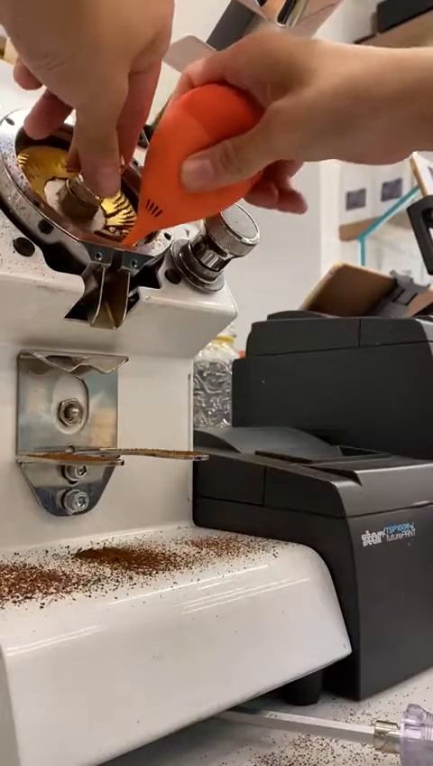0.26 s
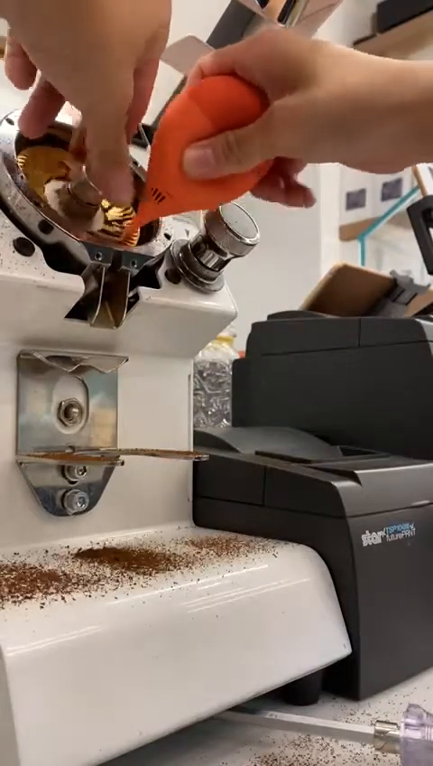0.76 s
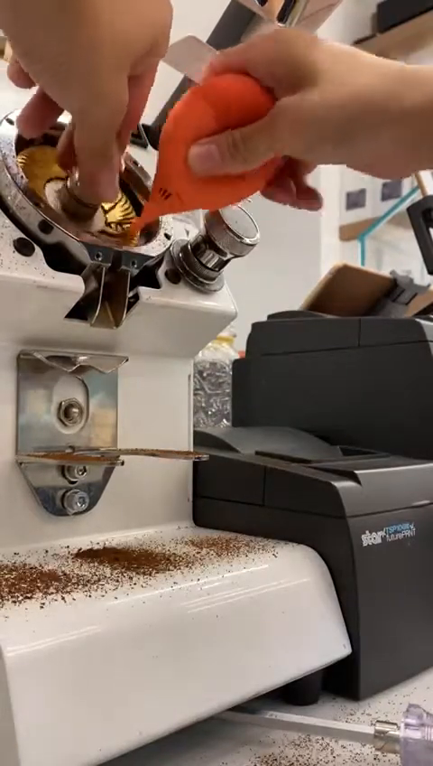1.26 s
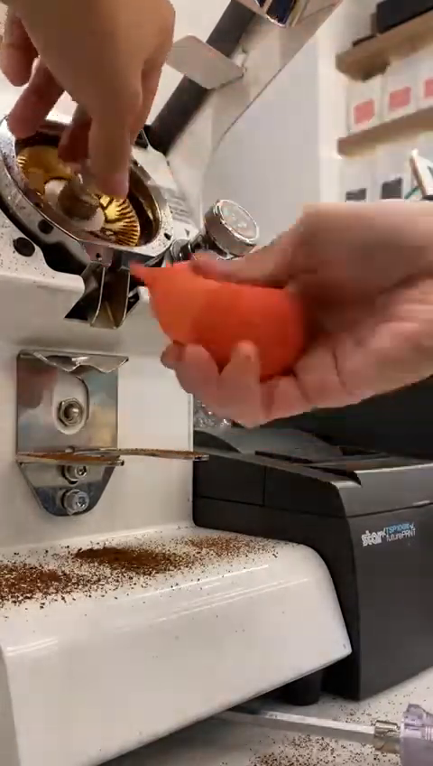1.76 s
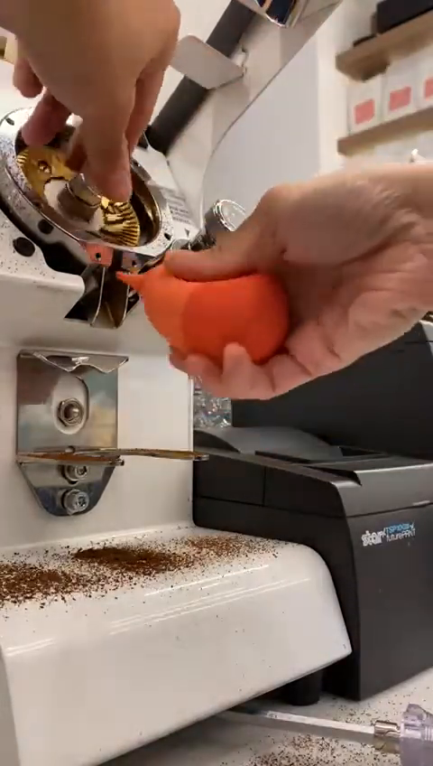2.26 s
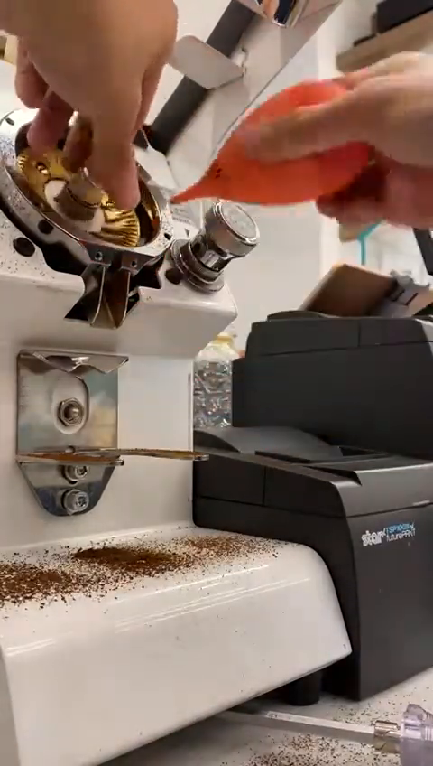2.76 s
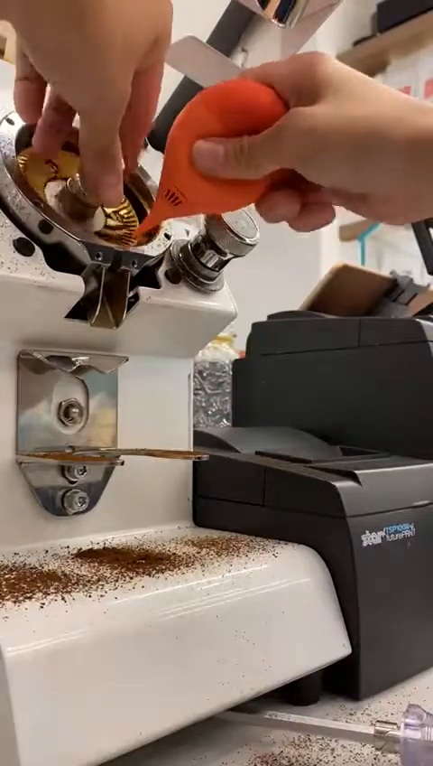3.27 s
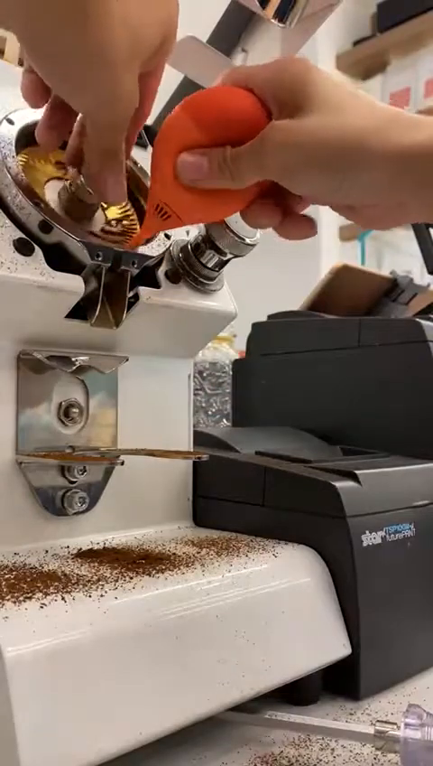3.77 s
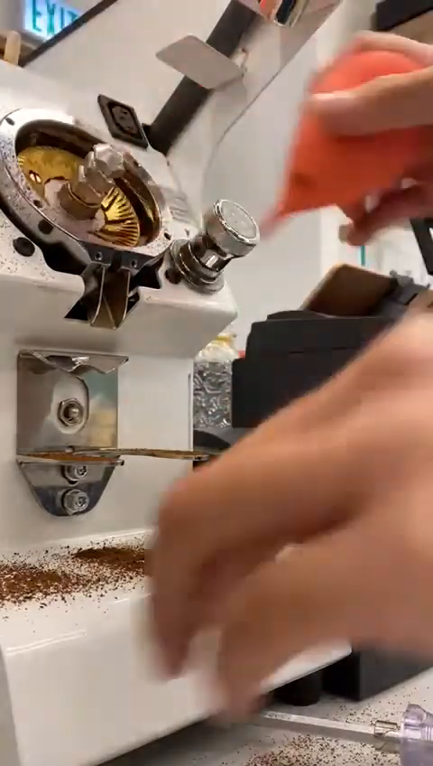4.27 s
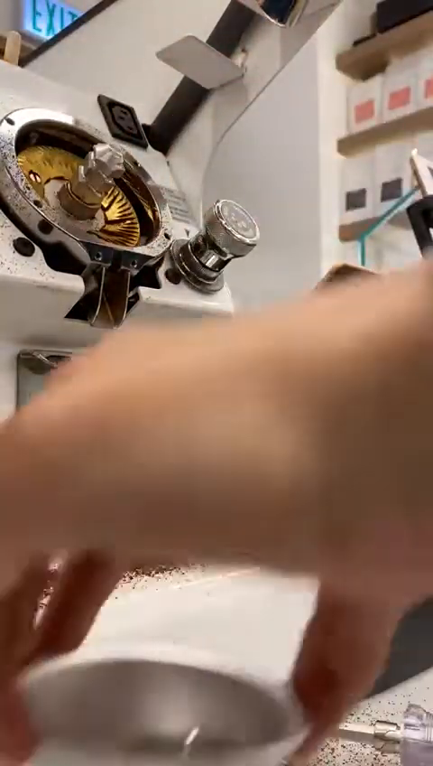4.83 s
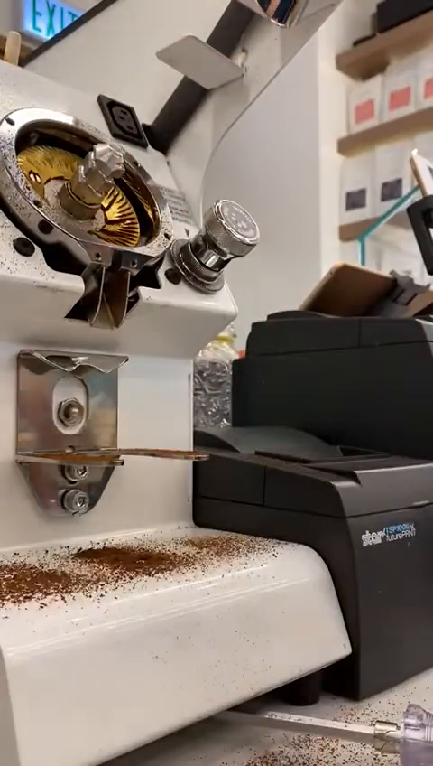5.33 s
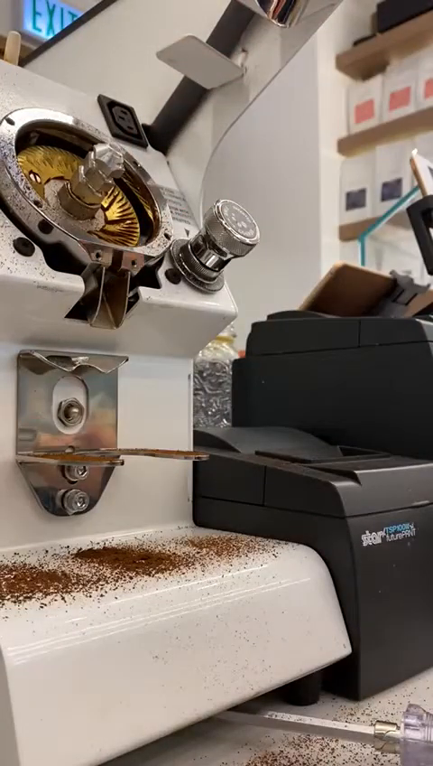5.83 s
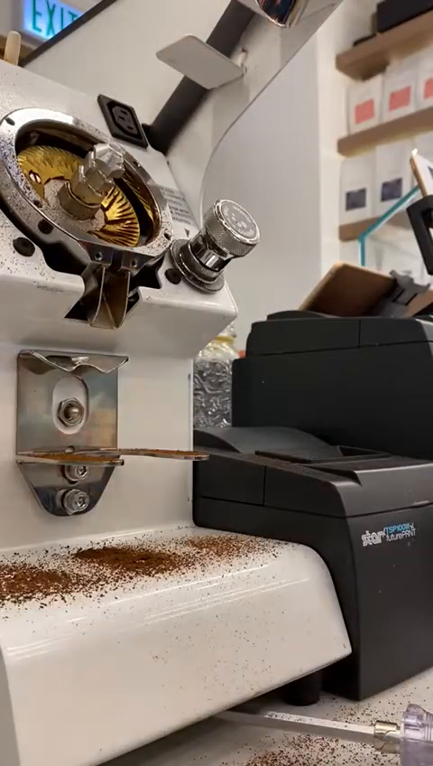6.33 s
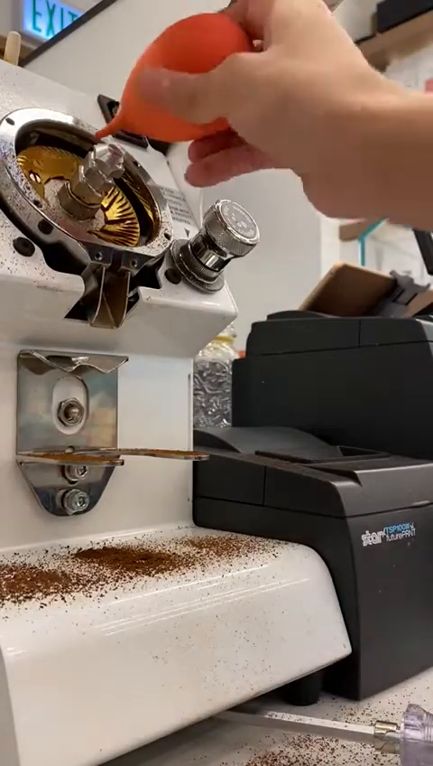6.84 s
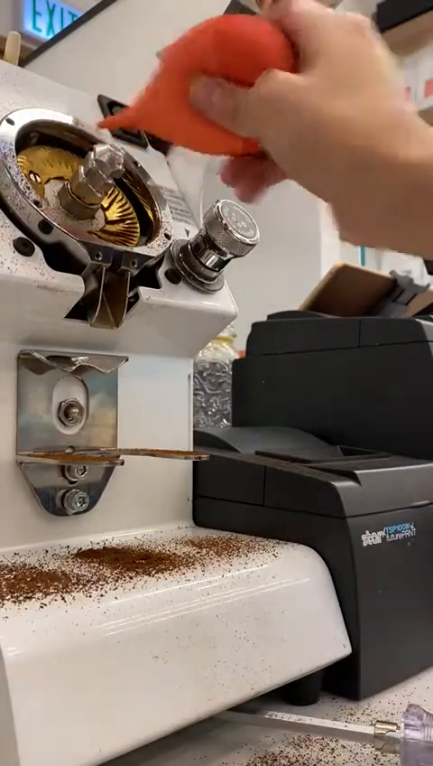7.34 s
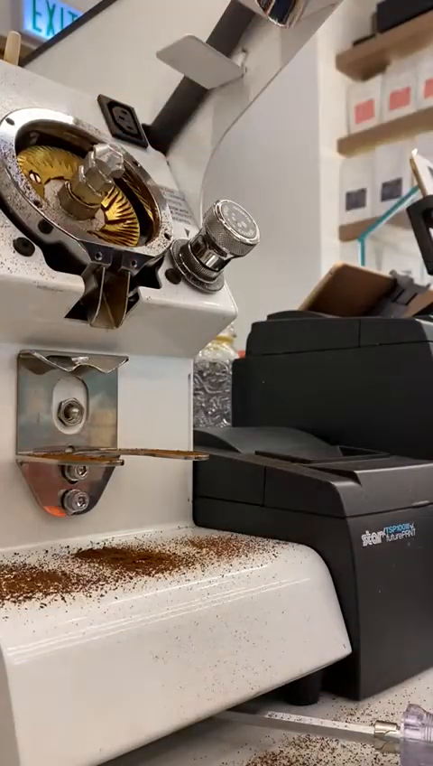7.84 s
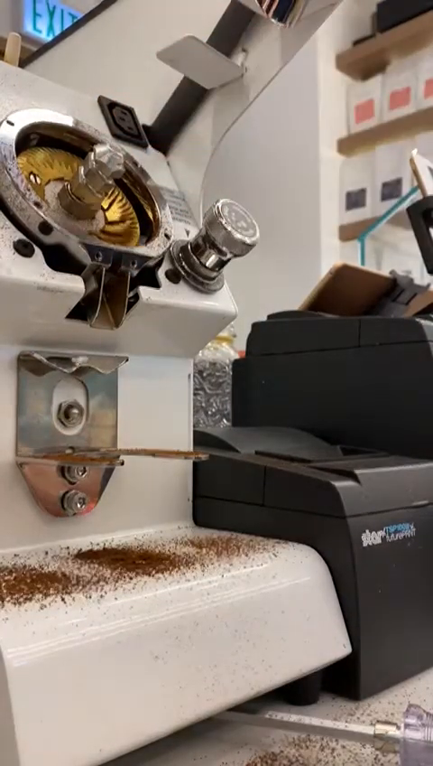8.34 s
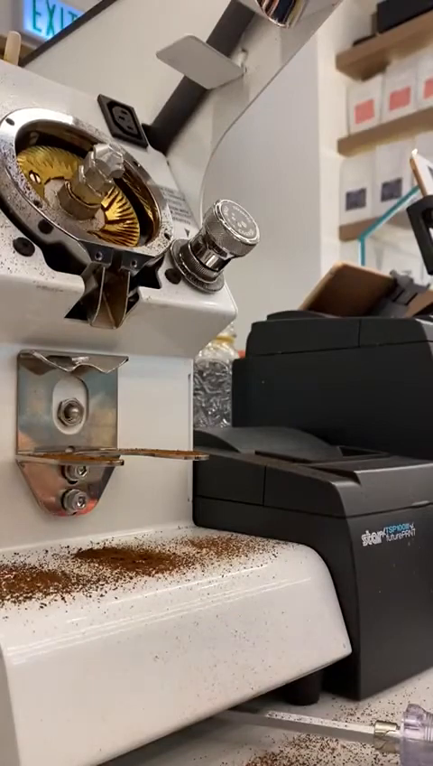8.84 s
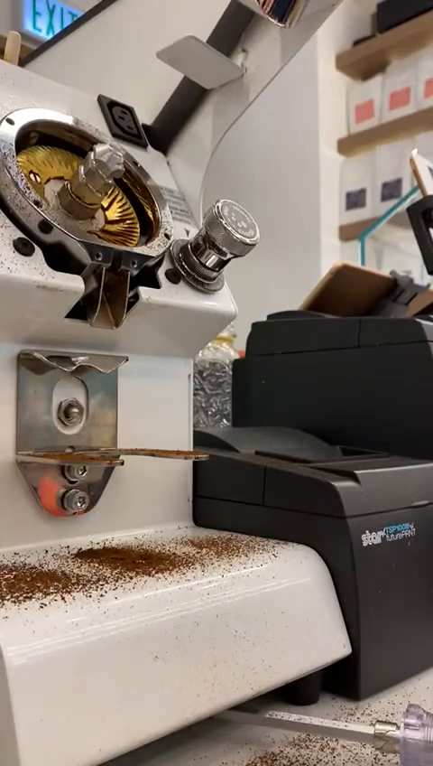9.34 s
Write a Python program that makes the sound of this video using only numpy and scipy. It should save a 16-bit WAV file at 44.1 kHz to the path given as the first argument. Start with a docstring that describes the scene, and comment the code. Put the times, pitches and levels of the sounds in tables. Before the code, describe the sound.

Quick squeezed air blasts with sucking refills, steel knocks and clinks, a bulb set down on a hollow lid, steady motor drone beneath.

```python
"""A counter in a room, heard close up by two microphones: a rubber bulb puffs air into a grinder's burr chamber
and hisses as it refills, each breath being noise shaped by flow strokes and resonances.
Steel, mostly a cup, is knocked and scraped (ringing modes, ticking noise) and clinks; the bulb is put down
on a hollow lid; two heavy thuds boom late. A motor beats against mains buzz, over air hiss and the drone,
rumble and tyres of a vehicle outside that speeds up and slows."""
import sys
import numpy as np
from scipy import signal
from scipy.fft import rfft, irfft
from scipy.io import wavfile

SR = 44100
rng = np.random.default_rng(int(sys.argv[2]) if len(sys.argv) > 2 else 0)


def bounce(signal):
    """Save signal as a 16-bit WAV file at the path given by the first command-line argument."""
    frames = np.transpose(np.atleast_2d(signal))
    limited = np.clip(frames, -1, 1)
    pcm = np.round(limited * 32767).astype(np.int16)
    wavfile.write(sys.argv[1], SR, pcm)


def how_loud(loudness_db):
    """Turn decibels into a plain amplitude multiplier (0 dB gives 1, 20 dB gives 10)."""
    steps = np.asarray(loudness_db, float) / 20
    return 10 ** steps


N = 423360  # samples
T = np.arange(N) / SR  # seconds
F = np.arange(N // 2 + 1) * SR / N + 1  # Hz, lifted by 1 to avoid zero


def noise():
    """White noise."""
    return rng.standard_normal(N)


def level(x, db):
    """Scale to an rms level."""
    return x * how_loud(db) / np.sqrt(np.mean(x ** 2))


def colour(x, points):
    """Filter by a curve of (Hz, dB) points, straight over log frequency, -60 dB outside it."""
    hz, db = np.transpose(points)
    gain_db = np.interp(np.log(F), np.log(hz), db, -60, -60)
    return irfft(rfft(x) * how_loud(gain_db), N)


def resonate(spectrum, peaks):
    """Pass a spectrum through a sum of steep (Hz, width Hz, dB) resonances; rms 1."""
    gain = sum(how_loud(db) / (1 + 1j * (F / hz - hz / F) * hz / width) ** 2 for hz, width, db in peaks)
    return level(irfft(spectrum * gain, N), 0)


def walk(rate):
    """Random levels joined by straight lines, rate points a second; spread about 1.75."""
    points = rng.standard_normal(int(rate * N / SR) + 2)
    return 2.1392 * np.interp(T * rate, np.arange(len(points)), points)


def add(track, s, sound):
    """Mix a sound in at time s."""
    i = int(s * SR)
    track[i:i + len(sound)] += sound[:N - i]


def ring(modes, contact_s, db, crack_db=-30, scatter=0., crack_hz=(1500, 9000)):
    """A short rough contact cracks and rings (Hz, dB, t60 s) modes, each blow a little different; peak at db."""
    t = T[:int(SR * (max(m[2] for m in modes) + 8 * contact_s))]
    chance = rng.standard_normal((len(modes), 2)) * scatter
    free = []
    for (hz, mode_db, t60), (detune, boost) in zip(modes, chance):
        decay = np.exp(-np.log(1000) * t / t60)
        free.append(how_loud(mode_db + 60 * boost) * decay * np.sin(2 * np.pi * hz * (1 + detune) * t))
    free = np.array(free)
    # the contact force: noise with a quick rise and a dying tail
    u = t[:len(t) // 2] / max(contact_s, 1 / SR)
    push = rng.standard_normal(len(u)) * np.minimum(3.7 * u, 1) * np.exp(-u)
    pushed = signal.fftconvolve(free, push[None], axes=1)[:, :len(t)]
    share = free.std(axis=1) / pushed.std(axis=1)  # every mode keeps its own level
    out = np.sum(pushed * share[:, None], axis=0)
    out = out / np.abs(out).max()
    crack = signal.sosfilt(signal.butter(2, crack_hz, "bandpass", fs=SR, output="sos"), push)
    add(out, 0, how_loud(crack_db) * crack / np.abs(crack).max())
    return out * how_loud(db) / np.abs(out).max()


def place(x, lag, echo_lag, echo):
    """Two ports: the right hears it after a lag and again off the counter; lags in samples, negative leads."""
    right = (np.roll(x, lag) + echo * np.roll(x, echo_lag)) / np.sqrt(1 + echo ** 2)
    return np.array([x, right])


ROOM_T60_S, ROOM_DB = 0.14677, -7


def room(x):
    """Add a short tail of decaying noise, different at each port."""
    t = T[:SR // 3]
    tails = rng.standard_normal((2, len(t))) * np.exp(-np.log(1000) * t / ROOM_T60_S)
    tails = tails * how_loud(ROOM_DB) / np.sqrt(np.sum(tails[0] ** 2))
    return x + signal.fftconvolve(x, tails, axes=1)[:, :N]


# The vehicle outside comes and goes. Each row: time in seconds, firing rate in Hz, relative level in dB.
VEHICLE = [(0.0, 46.61, -44), (1.07, 47.24, -39.5), (1.87, 58, -31), (2.81, 41.35, -37), (3.31, 39.63, -39),
           (4.2, 36.37, -38.5), (5.35, 42.34, -42.5), (5.93, 47.8, -47), (6.679, 49.91, -41),
           (7.3, 47.2, -49.5), (8.05, 52.38, -49), (8.6, 49, -46.5), (9.6, 49, -61)]
REFERENCE_DB = -45  # vehicle level at which hiss and rumble gain nothing


def vehicle():
    """Firing rate in Hz and level in dB over time, gliding from row to row."""
    s, hz, db = np.transpose(VEHICLE)
    return np.interp(T, s, hz), np.interp(T, s, db)


# Tone of the air hiss. Each row: frequency in Hz, relative level in dB.
AIR_TONE = [(500, -17.5), (900, -23), (1300, -5.5), (1560, -10.5), (1800, -14), (2800, -12.5),
            (3200, -19.5), (3600, -16), (6000, -23.5), (8500, -34.5), (12200, -26)]
AIR_DB, AIR_FOLLOW = -48, 0.3591  # base level; dB per dB of vehicle level


def air():
    """Smooth hiss, unrelated at the two ports, louder while the vehicle is near."""
    _, vehicle_db = vehicle()
    hiss = level(colour(rng.standard_normal((2, N)), AIR_TONE), AIR_DB)
    return hiss * how_loud(AIR_FOLLOW * (vehicle_db - REFERENCE_DB) + 1.2 * walk(8.2))


# Tone of the rumble. Each row: frequency in Hz, relative level in dB.
RUMBLE_TONE = [(20, -38), (32, -19.5), (55, -7.5), (110, -1), (175, -10), (300, -10), (420, -14.5),
               (620, -17.5), (900, -32.5), (2500, -43.5)]
# Resonance of the tyre noise. Each row: frequency in Hz, width in Hz, relative level in dB.
TYRE_RESONANCE = [(838.07, 356.24, 0)]
RUMBLE_DB, RUMBLE_FOLLOW = -35, 0.21784  # base level; dB per dB of vehicle level
TYRE_DB, TYRE_SWELL_DB, TYRE_SWELL_S, TYRE_WIDTH_S = -49, 6.5, 3.1518, 0.3148
HALF_ORDER_DB = -8  # the tone at one and a half times the firing rate


def street():
    """Engine drone, rumble and tyres through the wall; the bass is nearly alike left and right."""
    hz, db = vehicle()
    turn = 2 * np.pi * np.cumsum(hz) / SR
    half_order = how_loud(HALF_ORDER_DB + 1.3 * walk(0.86)) * np.sin(3 * turn / 2)
    drone = np.sqrt(2) * how_loud(db - 4.0 + 1.1 * walk(7.6)) * (np.sin(turn) + half_order)
    mid = colour(noise(), RUMBLE_TONE)
    # little width in the bass
    side = colour(colour(noise(), RUMBLE_TONE), [(20, -24.5), (110, -35.0), (350, -10.0), (700, -2.5), (3000, -10.5)])
    rumble = level(mid + side * np.array([[1], [-1]]), RUMBLE_DB)
    rumble = rumble * how_loud(RUMBLE_FOLLOW * (db - REFERENCE_DB) + 1.0 * walk(4.6))
    tyre_db = TYRE_DB + TYRE_SWELL_DB * np.exp(-((T - TYRE_SWELL_S) / TYRE_WIDTH_S) ** 2)
    tyres = resonate(rfft(rng.standard_normal((2, N))), TYRE_RESONANCE)
    return drone + rumble + tyres * how_loud(tyre_db + 0.5 * walk(8.7))


# The motor speed wanders a little. Each row: time in seconds, turning rate in Hz.
MOTOR_SPEED = [(0, 94.76), (1, 94.76), (2, 94.83), (3, 94.83), (4, 94.59), (5, 94.58), (6, 94.65),
               (7, 94.69), (9.6, 94.71)]
# Tones of the motor. Each row: multiple of the turning rate, level in dB, left minus right in dB.
MOTOR_ORDERS = [(1, -36.5, 1), (3, -39.5, -3), (4, -52, -2), (4.5, -58.5, 10), (5, -54, -5), (13, -60, 9.5),
                (14, -69, 22.5)]
MAINS_HZ, MAINS_DB = 99.99, -35
BEAT_PEAK_S = .066  # motor and mains are in step here


def hum():
    """Motor orders against mains buzz, about five beats a second."""
    turn = 2 * np.pi * np.cumsum(np.interp(T, *np.transpose(MOTOR_SPEED))) / SR
    turn = turn - turn[int(BEAT_PEAK_S * SR)]
    side = np.array([[.5], [-.5]])
    motor = sum(how_loud(db + pan_db * side + 1.3 * walk(4)) * np.cos(order * turn)
                for order, db, pan_db in MOTOR_ORDERS)
    mains = how_loud(MAINS_DB + 0.24 * walk(1.5)) * np.cos(2 * np.pi * MAINS_HZ * (T - BEAT_PEAK_S))
    return np.sqrt(2) * (motor + mains)


# Heavy thuds. Each row: start in seconds, knock level in dB, boom level in dB, contact in seconds,
# boom delay in seconds.
THUDS = [(.365, -11.5, -18.5, 0.01848, 0.024333), (8.362, -15, -19, 0.012356, 0.032352)]
# Modes of the counter. Each row: frequency in Hz, relative level in dB, t60 in seconds.
COUNTER_MODES = [(619.8, 7.5, 0.04766), (607.48, -15.5, 0.4097), (203.01, -8.5, 0.2639),
                 (334.15, 3, 0.02973), (797.96, -12.5, 0.14), (1090.3, -8.5, 0.02477),
                 (1371.5, -8.5, 0.06155), (1887.5, 0, 0.02625), (2520, -0.5, 0.03), (3184.8, -1.5, 0.0182)]
BOOM_HZ, BOOM_T60_S = 109.03, 0.4858


def thuds():
    """A wooden knock of counter modes, then the furniture's low decaying boom swells late."""
    knock, low = np.zeros((2, N))
    t = T[:SR // 2]
    swell = 1 - np.exp(-t / 0.0038)
    boom = swell * np.exp(-np.log(1000) * t / BOOM_T60_S) * np.sin(2 * np.pi * BOOM_HZ * t)
    for s, knock_db, boom_db, contact_s, late_s in THUDS:
        add(knock, s, ring(COUNTER_MODES, contact_s, knock_db, crack_db=-14))
        add(low, s + late_s, how_loud(boom_db) * boom / boom.max())
    return knock, low


SOFT_DB_PER_CYCLE = 1.097  # loss per cycle of the mode that fits in the contact


def dulled(modes, contact_s):
    """A longer, softer contact excites the high modes less."""
    return [(hz, db - SOFT_DB_PER_CYCLE * hz * contact_s, t60) for hz, db, t60 in modes]


# The bulb rocks on the lid. Each row: start in seconds, level in dB, contact in seconds,
# dry crack relative to the ring in dB.
PUT_DOWN = [(7.7233, -20.5, 0.0069, 12), (7.739, -32, 0.0047, 10.5), (7.748, -25.5, 0.0027, 1.5),
            (7.768, -15, 0.003215, 12.5), (7.779, -16, 0.0024, -20.5), (7.791, -22, 0.002, -14.5),
            (7.799, -29.5, 0.008, -8.5), (7.812, -31.5, 0.0086, -5.5), (7.838, -29.5, 0.0099, -17),
            (7.849, -28, 0.011625, -24.5), (7.926, -34.5, 0.0085, -21.5)]
# Modes of the hollow lid. Each row: frequency in Hz, relative level in dB, t60 in seconds.
LID_MODES = [(822.25, -9, 0.11), (1039.4, -13, 0.035), (1367.8, -3, 0.058), (1609.8, -2.5, 0.023),
             (1811.4, 8.5, 0.02581), (2113.5, 6.5, 0.023), (2478, -10.5, 0.034), (2692, -7.5, 0.04),
             (3272, -0.5, 0.05), (4553, -16, .02)]


def put_down():
    """Rubber rocking on a hollow lid: dry snaps and a short dull rumble from dulled modes."""
    out = np.zeros(N)
    for s, db, contact_s, crack_db in PUT_DOWN:
        modes = dulled(LID_MODES, contact_s)
        add(out, s, ring(modes, contact_s, db, crack_db, scatter=0.0362, crack_hz=(800, 3600)))
    return out


# Scrapes of the cup and rough noisy tails of the knocks. Each row: start in seconds, hold in seconds,
# wall level in dB, hollow relative to wall in dB, treble relative to wall in dB.
SCRAPES = [(3.349, 0.013, -39, -2, 0.5), (4.826, 0.05658, -37.5, -11, -2.5),
           (4.903, 0.06896, -38.5, -5.5, -5.5), (4.996, 0.017, -37.5, -5.5, -1.5),
           (5.027, 0.02877, -51.5, 5, -7), (5.071, 0.04636, -42, -1, 2.5),
           (5.159, 0.0404, -61.5, 17.5, -16), (5.297, 0.0083, -53, 4.5, -10.5),
           (5.414, 0.062, -46, -0.5, 2.5), (5.46, 0.047, -42, -0.5, 2), (5.514, 0.02552, -24.5, -5.5, -2),
           (5.548, 0.03925, -35.5, -1.5, -6.5), (5.645, 0.08654, -56.5, 0.5, 2),
           (5.784, 0.12, -56, 5, -4.5), (5.905, 0.1254, -50.5, -2, -12), (8.144, 0.032, -50.5, -6, 4),
           (8.172, 0.018, -40, 2, 1), (8.221, 0.0698, -53, 1, -11.5), (8.357, 0.051, -43, 6, -1),
           (8.576, 0.009, -46.5, 0, 2.5)]
SCRAPE_RISE_DB_PER_S, SCRAPE_FADE_DB_PER_S = 1306, 217


def scrape_swells(levels_db):
    """Amplitude of the scrapes and tails: quick rise, hold, slower fade, straight in dB."""
    total = np.zeros(N)
    for row, db in zip(SCRAPES, levels_db):
        start_s, hold_s = row[:2]
        rise = SCRAPE_RISE_DB_PER_S * (start_s - T)
        fade = SCRAPE_FADE_DB_PER_S * (T - start_s - hold_s)
        total += how_loud(db - np.maximum(rise, fade).clip(0, 200))
    return total


# Wall of the cup, rubbed. Each row: frequency in Hz, relative level in dB.
RUBBED_WALL = [(3750, -1.5), (4400, -1), (5500, -4.5), (6120, -2.5)]
# Hollow of the cup. Each row: frequency in Hz, width in Hz, relative level in dB.
HOLLOW = [(1052.7, 782.4, -17), (1914.2, 508.6, -5), (2400, 763.3, -9.5)]
# Treble modes of the steel, scraped or knocked. Each row: frequency in Hz, relative level in dB, t60 in seconds.
STEEL_TREBLE = [(7805.7, 3.5, 0.021), (9051, -1.5, 0.016), (10382, -1.5, 0.01), (11429, -4, .015)]
GRIP_DB = 2.8  # scales the random swell of each mode


def scraped_steel():
    """Rough steel contact: noise with sparse louder ticks in damped modes; returns body and treble."""
    _, _, wall_db, hollow_db, treble_db = np.transpose(SCRAPES)
    tick_db = 6.5 * rng.exponential(size=N).clip(0, 4) * (rng.random(N) < .012)
    ticks = rfft(noise() * how_loud(tick_db))
    # the grip shifts, so each mode swells and fades on its own
    wall = sum(how_loud(db + GRIP_DB * walk(45)) * resonate(ticks, [(hz, 700, 0)]) for hz, db in RUBBED_WALL)
    hollow = sum(how_loud(peak[2] + GRIP_DB * walk(45)) * resonate(ticks, [peak]) for peak in HOLLOW)
    body = how_loud(-7.5) * wall * scrape_swells(wall_db) + hollow * scrape_swells(wall_db + hollow_db)
    shine = resonate(ticks, [(hz, 900, db) for hz, db, _ in STEEL_TREBLE])
    return body, shine * scrape_swells(wall_db + treble_db) * how_loud(2.4545 * walk(43))


# What small thin steel sends out, with little bass. Each row: frequency in Hz, gain in dB.
THIN_STEEL = [(400, -40), (1200, -20), (1650, 0), (22050, 0)]
# Knocks on steel, mostly of the cup; the first is the bulb nozzle hitting metal. Each row: start in seconds,
# relative level in dB, lowest mode in Hz, relative treble in dB, contact in seconds.
KNOCKS = [(3.353, -17.5, 2400, 9, 0.0038), (4.825, -36, 2450, -3.5, 0.002),
          (4.889, -28.5, 2001, -6, 0.0022), (4.8642, -12, 1966, -17.5, 0.0013),
          (4.899, -24.5, 2166, -9, 0.0022), (4.908, -22.5, 2300, -13, 0.0018),
          (5.002, -25, 2087, -21, 0.0032), (5.098, -16.5, 1880, -17.5, 0.0013),
          (5.1023, -0.5, 1868, -17.5, 0.001788), (5.1605, -23, 2080, -27, 0.003),
          (5.393, -16.5, 2150, 3, 0.001207), (5.398, -25, 2300, -2, 0.00082),
          (5.514, -4.5, 2262, -7.5, 0.0012), (5.519, -17.5, 2300, -5, 0.002),
          (5.527, -14.5, 2210, -6.5, 0.0019), (5.5395, -11, 2450, 3, 0.0023),
          (5.6642, -24.5, 2006, -30.5, 0.0045), (5.8015, -30, 2044, -3.5, 0.0071),
          (5.844, -29, 2541, 0.5, 0.0041), (5.872, -33.5, 2300, -16.5, 0.003796),
          (5.8942, -12.5, 2450, -2, 0.0036), (5.901, -15.5, 2442, -2.5, 0.003834),
          (5.932, -9, 2520, -3, 0.003133), (5.94, -16.5, 2591, -3.5, 0.0029),
          (5.959, -18.5, 2690, -34.5, 0.0026), (6.0087, -25.5, 2564, 1, 0.0009),
          (8.169, -20.5, 2450, -9.5, 0.005676), (8.187, -12, 2400, -11.5, 0.0012),
          (8.193, -17, 2361, -22, 0.003), (8.204, -24.5, 2434, -16, 0.0044),
          (8.216, -30, 2400, -16.5, 0.0044), (8.36, -17.5, 2960, -8.5, 0.0018),
          (8.435, -25.5, 2589, 6, 0.0012), (8.445, -28.5, 2603, 8, 0.0014)]
# Upper modes of the steel. Each row: frequency in Hz, relative level in dB, t60 in seconds.
STEEL_MODES = [(3583.8, -1, 0.02858), (4159.5, -1.5, 0.0271), (5854, -1, 0.02645), (6232.2, 0, 0.0275)]
# the second upper mode weakens as the lowest mode drops below the full frequency
WALL_DB_PER_HZ, WALL_FULL_HZ, WALL_FULL_DB = 1.1338, 2450, 10
CRACK_DB, CRACK_PER_TREBLE_DB = -6, 1.1645  # the brighter the knock, the more dry crack


def knocked_steel():
    """Each contact rings its own lowest modes and shared upper ones; returns body and treble."""
    body, treble = np.zeros((2, N))
    first, second, *others = STEEL_MODES
    for s, db, hz, treble_db, contact_s in KNOCKS:
        wall_db = WALL_FULL_DB + WALL_DB_PER_HZ * min(hz - WALL_FULL_HZ, 0)
        wall = (second[0], wall_db, second[2])
        modes = [(hz, 12, .02), (1.0597 * hz, -2, .01), first, wall] + others
        crack_db = CRACK_DB + CRACK_PER_TREBLE_DB * treble_db
        add(body, s, how_loud(-5.5) * ring(modes, contact_s, db, crack_db, scatter=.022))
        add(treble, s, ring(STEEL_TREBLE, contact_s, db + treble_db - 0.5, crack_db=-10.5, scatter=0.0485))
    return colour(body, THIN_STEEL), treble


# Clinks of solid metal. Each row: start in seconds, relative level in dB, then the relative levels
# of the lowest, middle and top modes in dB.
CLINKS = [(8.315, -22, -26.5, -10, -10.5), (8.4133, -12, -12.5, -12, -23.5),
          (8.5704, -19, -33.5, -0.5, 3.5)]
# Short modes, then top modes. Each row: frequency in Hz, relative level in dB, t60 in seconds.
CLINK_SHORT = [(2280.4, -3, 0.01257), (2690, 2, 0.0143), (3322, -3.5, 0.00862), (5672, -13, 0.01)]
CLINK_TOP = [(6603.7, 2.5, 0.1455), (8875, -7, 0.0782), (10029, -11, 0.05)]
CLINK_LOW_HZ, CLINK_LOW_T60_S = 1872.1, 0.2884
CLINK_MID_HZ, CLINK_MID_T60_S = 4390, 0.1762


def clinks():
    """A clearer, longer ring of solid metal from a very short contact."""
    out = np.zeros(N)
    for s, db, low_db, mid_db, top_db in CLINKS:
        low = (CLINK_LOW_HZ, low_db, CLINK_LOW_T60_S)
        middle = (CLINK_MID_HZ, mid_db, CLINK_MID_T60_S)
        top = [(hz, mode_db + top_db, t60) for hz, mode_db, t60 in CLINK_TOP]
        add(out, s, ring([low, middle] + CLINK_SHORT + top, 0.001452, db, crack_db=-2.5))
    return colour(out, THIN_STEEL)


# The bulb wall pops back into shape. Each row: start in seconds, relative level in dB.
POPS = [(.475, -32.5), (.71, -35.5), (.94, -37.5), (1.175, -34.5), (1.4, -38.5), (1.97, -41), (2.235, -38),
        (2.49, -32.5), (7.4, -31.5)]
POP_HZ, POP_RISE, POP_S = 621.36, 0.26696, 0.026167  # start pitch, share it rises by, length


def pops():
    """The rubber wall springs back with a short blip of rising pitch."""
    out = np.zeros(N)
    t = T[:int(POP_S * SR)]
    cycles = POP_HZ * (t + POP_RISE * t ** 2 / POP_S / 2)
    blip = np.sin(np.pi * t / POP_S) ** 2 * np.sin(2 * np.pi * cycles)
    for s, db in POPS:
        add(out, s, how_loud(db) * blip)
    return out


EARLY = 0.9085  # under 1: the flow peaks before the middle of the stroke
FULL_FLOW = 0.86599  # the nozzle passes no more than this share of the stroke's peak


def strokes(rows, levels_db, power):
    """Air flow is a capped half sine over each stroke; noise grows as a power of the flow."""
    total = np.zeros(N)
    for row, db in zip(rows, levels_db):
        phase = np.clip((T - row[0]) / row[1], 0, 1) ** EARLY
        total += how_loud(db) * np.sin(np.pi * phase).clip(0, FULL_FLOW) ** power
    return total


# Squeezes. Each row: start in seconds, length in seconds, jet level in dB,
# chamber depth relative to jet in dB, nozzle treble relative to jet in dB.
PUFFS = [(0.062, 0.15593, -28.5, -8.5, -2), (0.292, 0.16876, -27.5, -7, -3), (0.539, 0.14986, -30, -17, 3),
         (0.777, 0.13483, -29.5, -13, 1), (1.006, 0.14754, -28, -5, -2), (1.242, 0.12568, -34, -5, 0.5),
         (1.792, 0.17118, -27, -10, 0.5), (2.049, 0.18587, -30, -15, 7), (2.308, 0.18346, -31, -20.5, 8),
         (2.93, 0.14824, -41.5, -0.5, -7), (3.186, 0.13844, -35, -5.5, -3.5),
         (3.435, 0.14349, -27.5, -2.5, -1), (3.709, 0.13686, -23.5, -1.5, -4.5),
         (3.938, 0.1575, -32, 1.5, -2), (6.589, 0.1709, -41, -5, -7.5), (6.907, 0.20627, -31, -2.5, -1.5),
         (7.195, 0.19138, -36, 2, 1)]
# The thumb presses harder for a moment. Each row: time in seconds, rise in dB.
SURGES = [(.13, 2), (.375, 4), (.83, 3.5), (1.075, 0), (1.31, 5), (2.165, 5.5), (2.995, 6), (3.245, 5.5),
          (3.475, 1.5), (3.765, 3), (7.015, 4), (7.266, 7.5)]
# The bulb sucks air back through the nozzle. Each row: start in seconds, length in seconds, level in dB.
REFILLS = [(-.044, 0.11392, -36), (0.2, 0.1208, -35.5), (0.444, 0.10104, -36.5), (0.674, 0.11213, -34.5),
           (0.896, 0.12237, -36), (1.146, 0.10034, -35), (1.341, 0.1589, -37), (1.933, 0.15285, -41),
           (2.214, 0.1198, -37.5), (2.455, 0.15006, -38), (3.041, 0.166, -43), (3.562, 0.15387, -37.5),
           (3.827, 0.13956, -36.5), (4.063, 0.10877, -41), (4.248, 0.2641, -54.5), (4.535, 0.2369, -49.5),
           (6.736, 0.1674, -43), (7.072, 0.1703, -42), (7.327, 0.2555, -43.5)]
# Resonances of chamber, burrs, nozzle and the intake past the burrs; FAR ones sound once the nozzle points
# at the far side of the empty chamber. Each row: frequency in Hz, width in Hz, relative level in dB.
CHAMBER = [(1681.9, 321.9, -1), (1938.5, 479.4, 6.5), (2360.2, 125.24, 10), (2690, 141.23, 11),
           (2867.2, 88.5, 10.5)]
FAR_CHAMBER = [(1830.3, 333.2, 4), (2080, 403.4, 9), (2345.2, 127.8, 11), (2782, 120.4, -1)]
BURRS_LOW = [(3723.2, 213.3, 4.847), (3944.7, 261.2, 6.406), (4330.9, 510.2, 4.728)]
FAR_BURRS_LOW = [(3418.8, 248.4, 5), (3628.8, 386, 4.5), (4003, 140, -6)]
BURRS_HIGH = [(4851.6, 477.9, 11.724), (5166.8, 220.4, 12.05), (5820.4, 524.4, 8.307), (6539.5, 1738, 2.1)]
FAR_BURRS_HIGH = [(5185.1, 363, 4.917), (5842.6, 309, 5.14), (6091.6, 354.5, 8.51), (6420.6, 400, 3.3)]
NOZZLE = [(7405, 593.1, 1.5), (9394.7, 573.9, -4), (9879.8, 353, -1), (10725, 487.2, -2.5),
          (11482, 1187.5, -6.5)]
INTAKE = [(2300, 1200, -3), (4193, 1100, -12.5), (5678, 861, 2.5)]
MOVED_S, SURGE_S = 6.3, 0.01363  # when the nozzle has moved; time constant of a surge
JET_POWER, CHAMBER_POWER, NOZZLE_POWER, REFILL_POWER = 3.3252, 3.6377, 3.9386, 3.2334
CHAMBER_SHARE_DB = -18.5  # a little of every jet fills the chamber, however it is aimed


def bulb():
    """Turbulent jet exciting chamber and burrs, treble from the nozzle both ways; returns body, rim, hiss."""
    _, _, jet_db, depth_db, treble_db = np.transpose(PUFFS)
    swirl = rfft(noise())

    def aimed(near, far):
        return np.where(T < MOVED_S, resonate(swirl, near), resonate(swirl, far))

    surge = how_loud(sum(db * np.exp(-((T - s) / SURGE_S) ** 2) for s, db in SURGES))
    gusts = how_loud(1.0 * walk(60)) * surge
    aim = how_loud(.5 * walk(4.5))  # the nozzle moves over the burrs
    refill = strokes(REFILLS, [row[2] for row in REFILLS], REFILL_POWER)
    intake = how_loud(-16.5) * refill
    stream = how_loud(-3.5) * strokes(PUFFS, jet_db, JET_POWER) * gusts + intake

    deep_flow = strokes(PUFFS, jet_db + depth_db, CHAMBER_POWER) * how_loud(0.45 + 0.9634 * walk(50)) * surge
    body = aimed(CHAMBER, FAR_CHAMBER) * deep_flow
    body += how_loud(CHAMBER_SHARE_DB) * stream * resonate(swirl, [(2290, 2700, 0)])
    body += stream * aimed(BURRS_HIGH, FAR_BURRS_HIGH) / aim
    body += intake * resonate(swirl, INTAKE)

    rim = stream * aimed(BURRS_LOW, FAR_BURRS_LOW) * aim * how_loud(np.where(T < MOVED_S, -1.2, -1.5))

    flicker = how_loud(2.1308 + 1.2 * walk(25.051))
    nozzle_flow = strokes(PUFFS, jet_db + treble_db, NOZZLE_POWER) * flicker + refill
    # the treble follows only half of each surge in dB
    hiss = resonate(swirl, NOZZLE) * nozzle_flow * gusts / np.sqrt(surge)
    return body + pops(), rim, hiss


def scene():
    """Each near source reaches the two ports with its own lags, then fills the room."""
    jet, rim, hiss = bulb()
    scrape, scrape_treble = scraped_steel()
    knock, knock_treble = knocked_steel()
    steel = scrape + knock + clinks()
    shine = hiss + scrape_treble + knock_treble
    near = place(jet, lag=17, echo_lag=-8, echo=0.3857)
    near += place(rim, lag=7, echo_lag=22, echo=0.1706)
    near += place(steel, lag=1, echo_lag=29, echo=-1.356)
    near += place(put_down(), lag=-9, echo_lag=-18, echo=-0.82)
    near += place(shine, lag=3, echo_lag=0, echo=1.0)
    thud, boom = thuds()  # the boom comes through the counter, alike at both ports
    return room(how_loud(3.0) * near + thud) + boom + hum() + street() + air()


def band_limit(x):
    """A steep low-pass at the top of the band."""
    return signal.sosfilt(signal.butter(12, 12340, fs=SR, output="sos"), x)


# Centre of the image, with a gap in the treble. Each row: frequency in Hz, gain in dB.
CENTRE = [(10, 0), (6200, 0), (6560, -8), (6700, -30), (8000, -30), (8300, 0), (11500, 0), (11950, -26),
          (22050, -60)]
# Width of the image, wide below and falling away in the treble. Each row: frequency in Hz, gain in dB.
WIDTH = [(10, 8.5), (9200, 1), (9800, -23.5), (22050, -10.5)]


def record(dry):
    """The two channels are split into centre and width, each filtered, then turned back into left and right."""
    mid = colour((dry[0] + dry[1]) / 2, CENTRE)
    side = colour((dry[0] - dry[1]) / 2, WIDTH)
    mix = np.array([mid + side, mid - side])
    return band_limit(mix)


dry = scene()
out = record(dry)
bounce(out)
```